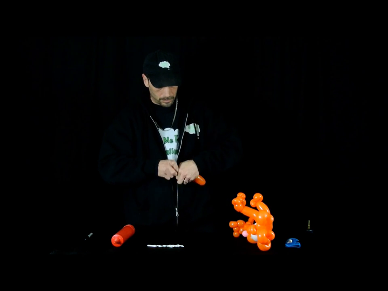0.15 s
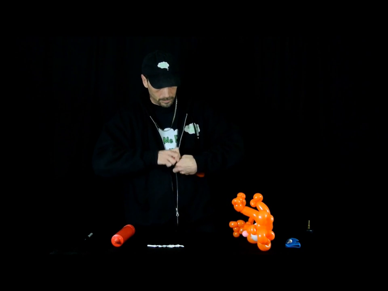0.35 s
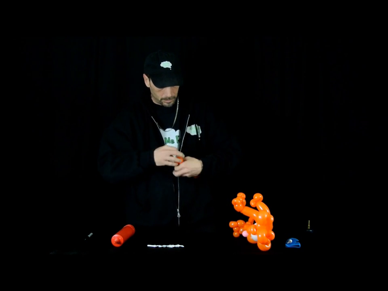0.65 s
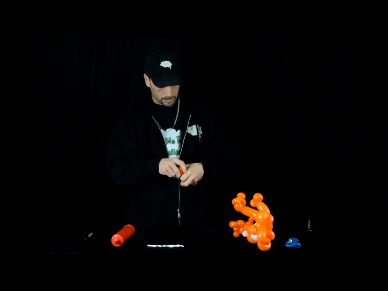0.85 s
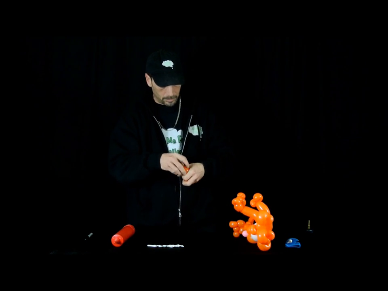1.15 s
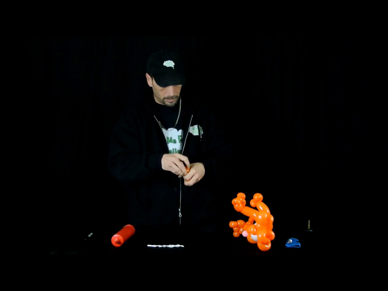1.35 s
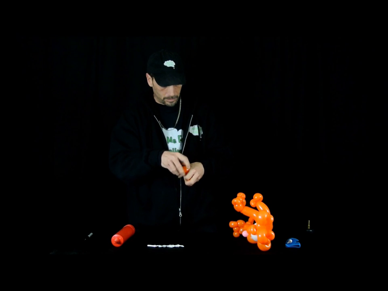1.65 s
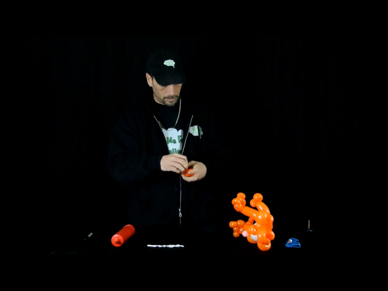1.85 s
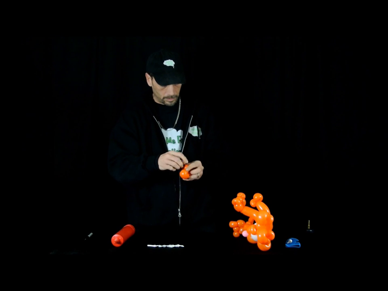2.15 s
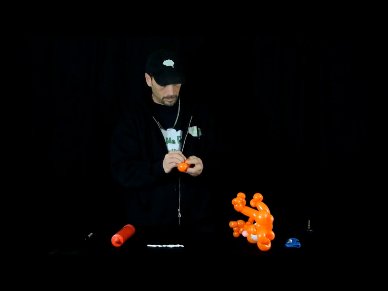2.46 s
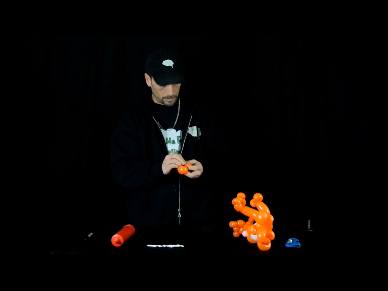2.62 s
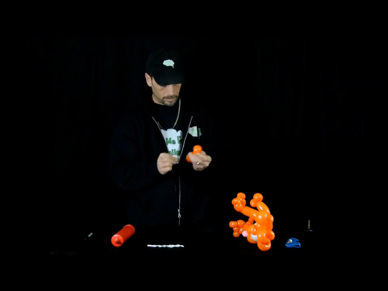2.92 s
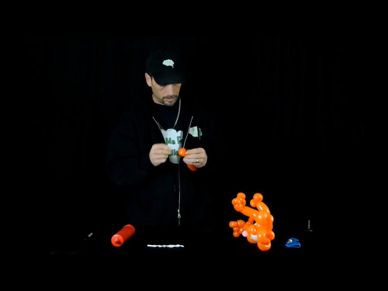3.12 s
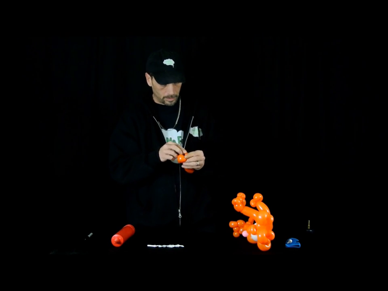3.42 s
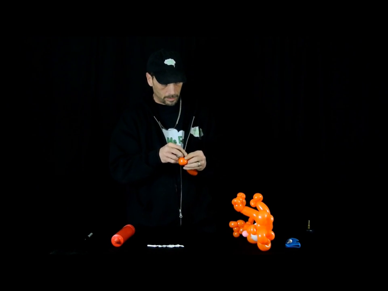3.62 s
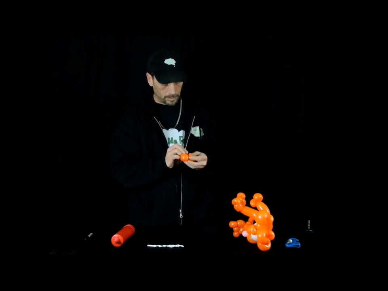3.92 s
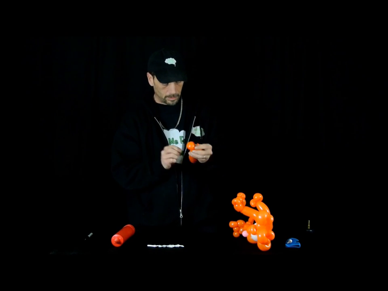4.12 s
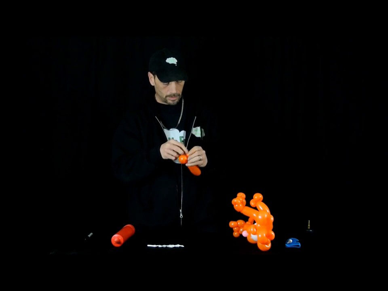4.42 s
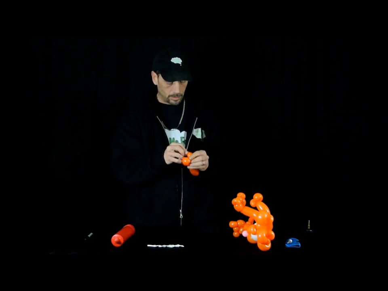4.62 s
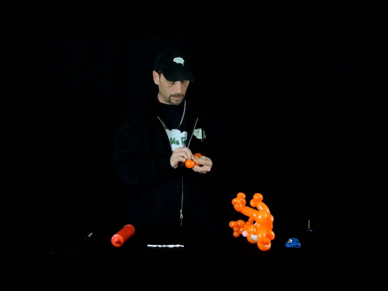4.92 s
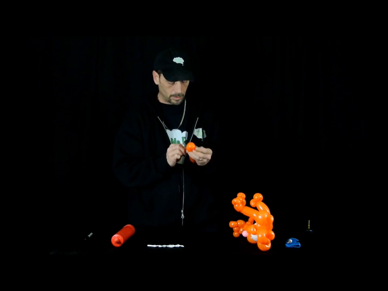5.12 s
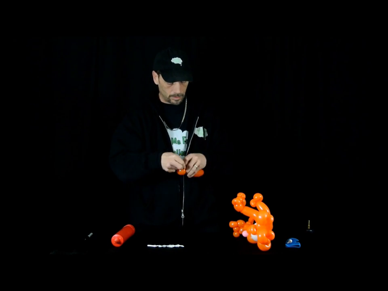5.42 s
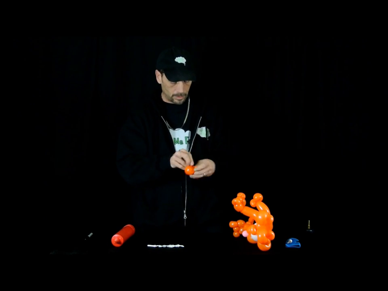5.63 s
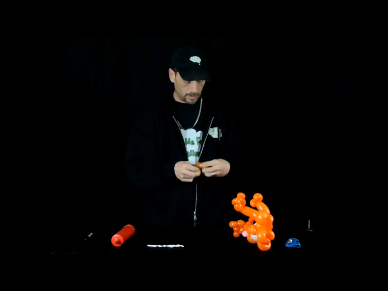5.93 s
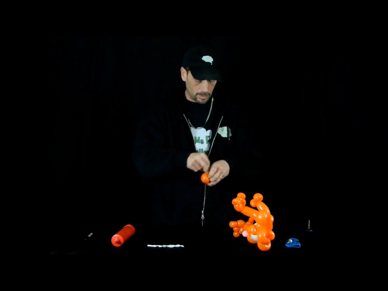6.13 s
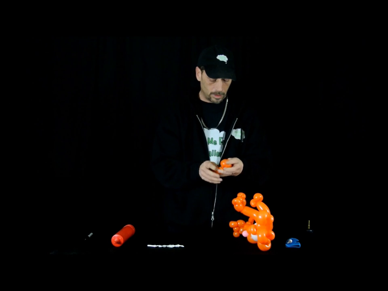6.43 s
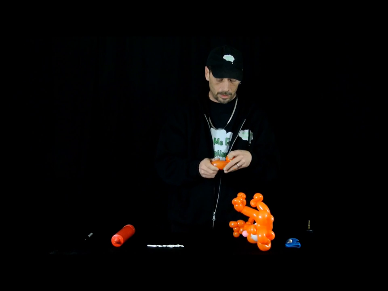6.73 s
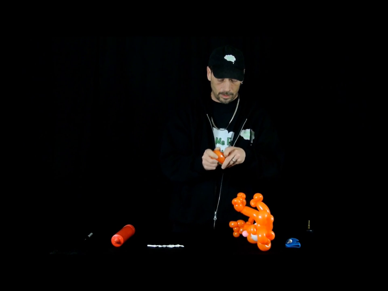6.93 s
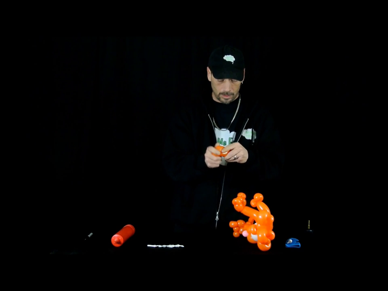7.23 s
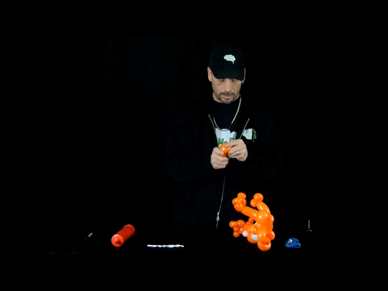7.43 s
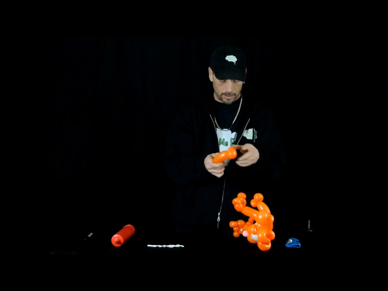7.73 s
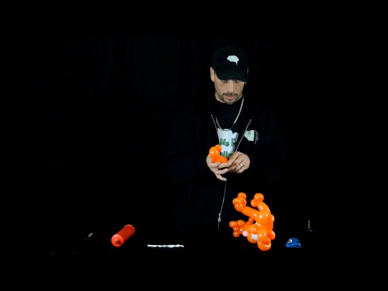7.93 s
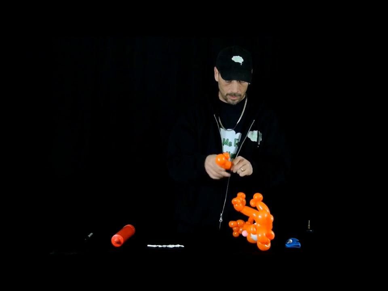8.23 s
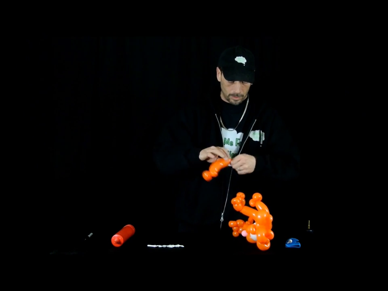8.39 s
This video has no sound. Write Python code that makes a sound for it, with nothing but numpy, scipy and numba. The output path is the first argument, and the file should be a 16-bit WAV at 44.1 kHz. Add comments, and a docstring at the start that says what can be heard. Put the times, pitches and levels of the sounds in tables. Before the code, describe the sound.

In a small room, close in stereo, hands twist a long latex balloon over a faint low hum and broad hiss. From the start, dry finger scuffs and grainy rubber rubbing come in uneven strokes; a bright snap, squeak and short creak stand out around 0.5 s. From 1 to 2.7 s the kneading is softer, with tiny squeaks and light ticks. Sharp snaps at about 2.9, 3.3 and 4.0 s bring rough falling sounds as the rubber slackens. Quieter rubbing follows until a hard pop at 5.6 s. Around 6 s the handling is denser, with short squeaks, a strong snap at 6.45 s and a squeaky creak near 6.6 s. Crisp, high snaps cluster between 7.1 and 7.5 s, then a duller snap and sagging ring come at 7.75 s. After 7.9 s only light scuffs remain, with a small tick near 8.45 s.

```python
"""Hands twist a long latex balloon into small bubbles: skin and latex rub in tiny random slips that ring
the bubbles, made from clicks and noise through moving filters. Now and then the rubber snaps free (ringing
noise bursts), creaks (steady pulses), squeaks (short tones) or goes slack (a rough ring, mostly sinking).
A small room answers every sound with fading noise, over a low hum and hiss, all heard in stereo."""
import sys
import numpy as np
from scipy import signal
from scipy.fft import rfft, irfft
from scipy.io import wavfile
from scipy.ndimage import uniform_filter1d
from numba import njit

SR = 44100
rng = np.random.default_rng(int(sys.argv[2]) if len(sys.argv) > 2 else 0)


def generate_wav(sig):
    """Save sig (samples, or channels by samples) to the path in sys.argv[1] as 16-bit PCM at SR."""
    pcm = np.round(np.clip(np.atleast_2d(sig).T, -1, 1) * 32767).astype(np.int16)
    wavfile.write(sys.argv[1], SR, pcm)


N = 377496


def undb(db):
    """Turn decibels into a plain amplitude factor."""
    return 10 ** (np.asarray(db) / 20)


def unit(x):
    """Scale a sound to an RMS (average strength) of 1."""
    return x / np.sqrt(np.mean(x ** 2))


@njit
def moving_band_pass(x, hz, width):
    """State-variable band-pass whose centre may move, gain 1 at the centre."""
    y, band_state, low_state = np.empty(len(x)), 0., 0.
    for i in range(len(x)):
        g, damping = np.tan(np.pi * hz[i] / SR), width[i] / hz[i]
        v = (band_state + g * (x[i] - low_state)) / (1 + g * (g + damping))
        band_state = 2 * v - band_state
        low_state += 2 * g * v
        y[i] = damping * v
    return y


def band(x, hz, width):
    """Band-pass with a fixed or moving centre and width [Hz]."""
    moving = np.zeros(len(x))
    return moving_band_pass(x + 1e-18, hz + moving, width + moving)  # the offset avoids slow, tiny numbers


def colour(x, points):
    """Shape a full-length sound by (frequency [Hz], gain [dB]) points."""
    hz, db = np.transpose(points)
    f = np.arange(N // 2 + 1) * SR / N + 1  # +1 avoids log(0)
    gain = undb(np.interp(np.log(f), np.log(hz), db))
    return irfft(rfft(x) * gain, N)


# tone of the background hiss: (frequency [Hz], relative level [dB])
HISS_FLOOR = [(15, -30), (25, 3), (64, -1.5), (170, 3), (714, 4.5), (988, 1), (1330, 1), (2220, -1.5),
              (3080, -4.5), (11900, -8.5), (14400, -11), (16000, -12)]
HISS_FLOOR_DB = -52.5  # RMS level
# steady hum tones: (frequency [Hz], width of the wavering part [Hz], level [dB])
HUM_TONES = [(58.8, 9.8, -62), (116.6, 33, -68), (168, 28, -78.5), (238, 23, -72.5)]


def background():
    """A slightly wavering hum, alike left and right, over broad hiss that differs between the sides."""
    mid = colour(rng.standard_normal(N), HISS_FLOOR)
    side = colour(rng.standard_normal(N), HISS_FLOOR)
    hiss = undb(HISS_FLOOR_DB) * unit(mid + 0.76 * side * np.array([[1], [-1]]))
    t = np.arange(N) / SR
    hum = 0
    for hz, width, db in HUM_TONES:
        waver = unit(band(rng.standard_normal(N), hz, width))
        hum = hum + undb(db) * (np.sin(2 * np.pi * hz * t) + .5 * waver)
    return hiss + hum


# bands of the room's answer: (centre [Hz], time to fall 60 dB [s], relative level [dB])
ROOM_BANDS = [(231, 0.5, -10), (730, 0.11, -4), (2060, 0.17, -1), (4670, 0.068, -8), (11400, 0.06, -10.5)]


def room(x, count=4):
    """A fading, diffuse answer, different left and right; the blend of answers drifts as the hands move."""
    t, out = np.arange(SR // 2) / SR, 0
    place = unit(uniform_filter1d(rng.standard_normal((count, N)), size=SR // 5))
    shares = place / np.sqrt(np.sum(place ** 2, axis=0))  # the shares' powers always add up to 1
    for share in shares:
        tail = 0
        for hz, t60, db in ROOM_BANDS:
            white = rng.standard_normal((2, len(t)))
            noise = np.array([band(band(n, hz, 1.6 * hz), hz, 0.94 * hz) for n in white])
            fade = (1 - np.exp(-t / 0.00057)) * undb(-60 * t / t60)
            tail = tail + undb(db) * noise * fade / np.sqrt(np.sum(fade ** 2))
        out = out + signal.oaconvolve((share * x)[None], tail, axes=1)[:, :N]
    return out


# a bubble slackening under the grip:
# (start [s], pitch at start [Hz], pitch at end [Hz], length [s], level [dB])
GRIP_SLACKENING = (7.6, 1400, 1020, 0.1, -39)


def slackening():
    """A rough ring: noise in a narrow band that sinks in pitch while its level swells and fades."""
    start, hz0, hz1, length, db = GRIP_SLACKENING
    out, u = np.zeros(N), np.linspace(0, 1, int(length * SR))
    hz = hz0 * (hz1 / hz0) ** u
    ring = unit(band(band(rng.standard_normal(len(u)), hz, .25 * hz), hz, .4 * hz))
    i = int(start * SR)
    out[i:i + len(u)] = undb(db) * ring * np.sin(np.pi * u) ** .7
    return out


# the tube springing slack after a hard snap:
# (start [s], pitch at start [Hz], pitch at end [Hz], length [s], starting level [dB])
SLACK_SAGS = [(2.893, 620, 280, 0.093, -30.5), (3.983, 660, 210, 0.084, -35), (5.626, 300, 80, 0.018, -40),
              (7.754, 700, 200, 0.12, -32.5)]


def sags():
    """A rough ring of filtered noise that slides down and fades as tension leaves the tube."""
    out = np.zeros(N)
    for start, hz0, hz1, length, db in SLACK_SAGS:
        u = np.linspace(0, 1, int(length * SR))
        hz = hz0 * (hz1 / hz0) ** u
        ring = unit(band(band(rng.standard_normal(len(u)), hz, .5 * hz), hz, 1.4 * hz))
        swell = np.minimum(30 * u, 1) * (1 - u ** 4)  # quick start, smooth end
        i = int(start * SR)
        out[i:i + len(u)] += undb(db - 14 * u) * ring * swell
    return out


# a bubble squeaking on one pitch:
# (start [s], end [s], pitch at start [Hz], pitch at end [Hz], middle level before wavering [dB])
PITCHED_SQUEAKS = [(0.093, 0.124, 3250, 3400, -51), (0.535, 0.598, 1250, 1260, -46),
                   (0.917, 1.012, 783, 700, -49.5), (1.394, 1.445, 774, 770, -47),
                   (1.809, 1.862, 718, 700, -47.5), (2.94, 2.995, 202, 170, -47.5),
                   (3.021, 3.06, 1205, 1200, -48.5), (3.186, 3.235, 1266, 1260, -38.5),
                   (3.999, 4.036, 510, 500, -41), (4.035, 4.1, 194, 169, -43),
                   (4.778, 4.806, 698, 700, -47.5), (5.231, 5.246, 460, 380, -44),
                   (5.581, 5.633, 388, 370, -48), (5.865, 5.913, 373, 430, -49.5),
                   (6.064, 6.127, 376, 290, -47.5), (6.178, 6.212, 1217, 1250, -40),
                   (6.202, 6.243, 520, 310, -45), (6.58, 6.645, 868, 850, -36.5),
                   (6.582, 6.611, 1320, 1310, -40), (6.635, 6.699, 757, 660, -46),
                   (6.675, 6.81, 1050, 1050, -43.5), (7.34, 7.39, 1260, 1240, -47.5)]


def squeaks():
    """Short tones with a faint overtone, wavering in pitch and level."""
    out = np.zeros(N)
    for t0, t1, hz0, hz1, db in PITCHED_SQUEAKS:
        i = np.arange(int(t0 * SR), int(t1 * SR))
        waver = unit(uniform_filter1d(rng.standard_normal((2, len(i))), size=200))
        hz = np.linspace(hz0, hz1, len(i)) * (1 + 0.006 * waver[0])
        phase = 2 * np.pi * np.cumsum(hz) / SR
        level = undb(db + 4.5 * waver[1]) * np.hanning(len(i)) ** 0.14
        out[i] += level * (np.sin(phase) + 0.05 * np.sin(2 * phase))
    return out


# ringing modes of the taut bubbles: (frequency [Hz], width before hand damping [Hz], base level [dB])
BUBBLE_MODES = [(378, 29, -38), (674, 310, -15), (829, 32, 0), (1345, 144, 4.5), (1558, 128, 4),
                (2390, 860, 0), (2856, 69, 0.5), (3590, 1670, 0)]


def bubbles(x):
    """The taut bubbles ring on their modes: band-passes side by side, with alternating sign."""
    return sum((-1) ** k * undb(db) * band(x, hz, width) for k, (hz, width, db) in enumerate(BUBBLE_MODES))


# regular stick-slip: (start [s], end [s], slip rate at start [Hz], rate at end [Hz],
# level driving the bubbles [dB])
STICK_SLIP_CREAKS = [(0.56, 0.604, 630, 660, -37), (5.916, 5.954, 659, 640, -33),
                     (6.584, 6.64, 436, 436, -27)]


def creaks():
    """The rubber sticks and slips at a nearly steady rate; each slip is a fading pulse into the bubbles."""
    pulses = np.zeros(N)
    for t0, t1, hz0, hz1, db in STICK_SLIP_CREAKS:
        i = np.arange(int(t0 * SR), int(t1 * SR))
        wobble = unit(uniform_filter1d(rng.standard_normal(len(i)), size=100))
        rate = np.linspace(hz0, hz1, len(i)) * (1 + 0.02 * wobble)
        cycle = np.cumsum(rate) / SR % 1  # position within one stick-slip, 0 to 1
        slip = np.exp(-cycle / 0.076)
        pulses[i] += undb(db) * np.hanning(len(i)) ** 0.29 * unit(slip - slip.mean())
    return bubbles(pulses)


# rubber snapping free: (time [s], peak level before panning [dB], ring pitch [Hz],
# crack against ring [dB], bubble modes against ring [dB], time for the driving burst to fall 17 dB [ms])
RUBBER_SNAPS = [(0.0923, -36, 3330, -1, -11, 4), (0.195, -24, 4900, 2, -11, 3.3),
                (0.5106, -25.5, 4820, 5, -4, 2.7), (0.5195, -14, 1260, 21, -5.5, 3.3),
                (0.8992, -30, 1310, -6, 6, 4.3), (1.509, -35, 1300, -8, -2, 3),
                (1.57, -26.5, 1390, 3, 2, 3.5), (2.241, -36, 2500, -5, 0, 3),
                (2.3117, -34, 3000, -10, 0, 4.6), (2.8957, -19, 1540, -15, -9, 4.3),
                (2.9013, -11.5, 1510, -19, -11, 2.4), (2.9098, -9.5, 2100, 0, 9, 4),
                (3.024, -27, 1220, 5, -2, 3.3), (3.14, -29, 1360, 12, 6, 3),
                (3.2698, -18, 2550, -1, 4, 2.2), (3.323, -8.5, 1250, -4.5, 0, 1.3),
                (3.7598, -29, 1300, -24, -25, 7.8), (3.986, -14.5, 1240, -12, -17, 9),
                (3.9905, -7.5, 2540, -0.5, -6, 7.7), (4.876, -26, 1050, -22, -10, 6.6),
                (5.2608, -17.5, 1870, -8, -5, 2.9), (5.5668, -23, 4730, 8, -14, 3),
                (5.5872, -20, 2560, -1, -5, 3), (5.626, -2, 2100, -24, 2.5, 2.2),
                (5.874, -28, 4100, 7, -14, 3), (5.922, -18, 1290, -13, 21, 3.4),
                (6.4451, -3, 2260, 1.5, -0.5, 3), (7.0962, -11.5, 3800, -3, -5.5, 4.8),
                (7.1202, -8, 4700, 5, -17, 3.6), (7.1334, -7, 4700, 10, -7, 2),
                (7.248, -20, 5000, 15, 2, 3), (7.3884, -11.5, 4800, 4, -5, 4.8),
                (7.3924, -8, 3540, 13, -4, 3.5), (7.427, -15, 4760, 13, -2, 3),
                (7.5184, -8, 2700, 7.5, -2, 2.2), (7.681, -17, 2410, -5, 11, 2.8),
                (7.7526, -10, 845, 5, 3, 5.4), (8.4473, -31, 2200, 9, 1, 4.8)]
SNAP_PAN_DB = 2  # typical spread of left minus right from snap to snap


def snaps():
    """Each snap is a short ragged burst: a ring on its own pitch, the bubble modes and a high crack."""
    out, t = np.zeros((2, N + SR)), np.arange(int(.05 * SR)) / SR
    for start, db, hz, crack_db, modes_db, ms in RUBBER_SNAPS:
        noise = rng.standard_normal(len(t))
        burst = noise * abs(noise) ** 0.21 * np.exp(-t * 2000 / ms)  # the power makes it spikier
        ring = band(band(burst, hz, 0.16 * hz), hz, 0.98 * hz)
        modes = bubbles(burst)
        crack = band(band(burst, 10100.0, 8400.0), 11500.0, 10400.0)
        parts = (0, ring), (modes_db, modes), (crack_db, crack)
        snap = sum(undb(d) * part / abs(part).max() for d, part in parts)
        pan_db = SNAP_PAN_DB * rng.standard_normal()
        sides_db = db + np.array([[pan_db], [-pan_db]]) / 2
        i = int(start * SR)
        out[:, i:i + len(t)] += undb(sides_db) * snap / abs(snap).max()
    return out[:, :N]


SLIPS_PER_S, SLIP_SPREAD_DB = 2500, 3  # average rate; how unevenly loud the slips are


def slips():
    """Tiny random slips of uneven size over a fine scrape, both swelling and dipping in a stutter."""
    hit = rng.random(N) < SLIPS_PER_S / SR
    size_db = SLIP_SPREAD_DB * np.minimum(rng.exponential(size=N), 3.5)
    size = undb(size_db) * rng.choice([-1, 1], N)
    stutter_db = unit(uniform_filter1d(uniform_filter1d(rng.standard_normal(N), size=300), size=300))
    return (unit(hit * size) + 0.95 * rng.standard_normal(N)) * undb(stutter_db)


HAND_DAMPING = 1.7  # the palms widen each mode by this factor
SQUEEZE_SHIFT, SQUEEZE_DB = 0.035, 2.5  # typical wander in pitch (share) and in level [dB]


def kneaded(x):
    """The bubble modes while the hands squeeze: each wanders in pitch and strength."""
    out, knots = 0, np.arange(0, N + 1500, 1500)
    for k, (hz, width, db) in enumerate(BUBBLE_MODES):
        shift, swell = (np.interp(np.arange(N), knots, r) for r in rng.standard_normal((2, len(knots))))
        moving_hz = hz * (1 + SQUEEZE_SHIFT * shift)
        level = undb(db + SQUEEZE_DB * swell)
        out = out + (-1) ** k * level * band(x, moving_hz, HAND_DAMPING * width)
    return out


HOLD_S = 0.032  # longest time the rubber sticks before a snap


def sticking():
    """Time as the rubber feels it: it sticks, so nothing swells just before a snap."""
    time, before = np.arange(N) / SR, 0
    for snap_time, *_ in RUBBER_SNAPS:
        start = max(snap_time - HOLD_S, before + 0.0092)  # stay clear of the previous snap
        time[int(start * SR):int(snap_time * SR)] = start
        before = snap_time
    return time


STROKE_DROP_DB, STROKE_ROUND = 20, 1.39  # drop one rise or fall from the top; roundness of the top
# scrape left by a snap, against its peak; time for it to fall by STROKE_DROP_DB
AFTER_RUB_DB, AFTER_SLIDE_DB, AFTER_S = -28, -18.5, 0.035
# strokes of the hands: (strongest at [s], rise [s], fall [s], latex on latex [dB], fingers on skin [dB],
# slack low body [dB], ring centre [Hz], low body centre [Hz])
HAND_STROKES = [(0.0, 0.011, 0.098, -52, -41.5, -59, 2480.0, 590.0),
                (0.088, 0.032, 0.14, -48, -47.0, -64.0, 3580.0, 600.0),
                (0.2, 0.008, 0.15, -50.0, -42.5, -68, 2500.0, 450.0),
                (0.34, 0.081, 0.33, -45.5, -42.0, -58.5, 2170, 480.0),
                (0.526, 0.062, 0.1, -40.5, -35.5, -59, 1900.0, 840.0),
                (0.579, 0.025, 0.1, -30, -32.5, -46.5, 1800.0, 1000.0),
                (0.657, 0.039, 0.076, -39.5, -43, -49.5, 2230.0, 810.0),
                (0.972, 0.3, 0.099, -38.5, -40.5, -50.5, 2200, 850.0),
                (1.101, 0.038, 0.082, -47, -44, -55, 2020.0, 643),
                (1.168, 0.05, 0.16, -42, -40.5, -55, 2310.0, 810.0),
                (1.422, 0.24, 0.057, -40, -41.0, -53, 1650, 910.0),
                (1.519, 0.025, 0.033, -43.5, -46, -47.5, 1710.0, 740.0),
                (1.6, 0.062, 0.095, -38.5, -39, -53, 1690.0, 860.0),
                (1.828, 0.06, 0.046, -42, -42.0, -51, 1930, 800.0),
                (1.891, 0.186, 0.13, -41, -39.5, -52.0, 2220.0, 690.0),
                (2.048, 0.084, 0.28, -46.5, -48.0, -58, 1950.0, 630.0),
                (2.246, 0.011, 0.067, -43.5, -53.5, -65, 1990.0, 620.0),
                (2.328, 0.036, 0.063, -36.5, -46, -58.0, 3220, 560.0),
                (2.381, 0.063, 0.24, -36.5, -40.0, -56, 2160, 685),
                (2.692, 0.048, 0.05, -33.0, -52.5, -61, 2790.0, 640.0),
                (2.702, 0.17, 0.244, -41.5, -38, -54, 2800.0, 700.0),
                (2.865, 0.028, 0.04, -39.5, -35.0, -62, 1600.0, 600.0),
                (2.921, 0.066, 0.074, -25.5, -30.5, -35.5, 1650, 533),
                (3.039, 0.1, 0.069, -40, -41, -47.5, 1440.0, 656),
                (3.186, 0.081, 0.1, -33.5, -34.5, -49, 1660, 760),
                (3.274, 0.024, 0.051, -34.5, -39.5, -52, 1950.0, 730.0),
                (3.325, 0.009, 0.11, -30.5, -38.5, -41, 1270.0, 940.0),
                (3.547, 0.063, 0.1, -48.5, -49.0, -60, 1780.0, 740.0),
                (3.682, 0.042, 0.043, -50.5, -54.5, -61.0, 1480.0, 730.0),
                (3.836, 0.16, 0.219, -39.5, -46.5, -52.0, 2190.0, 880.0),
                (3.994, 0.028, 0.12, -27.5, -31.5, -35.5, 2000, 800.0),
                (4.293, 0.35, 0.19, -48.5, -51, -57.5, 1960, 610.0),
                (4.487, 0.14, 0.026, -48, -52, -54.0, 1470.0, 578),
                (4.618, 0.075, 0.042, -35.0, -58, -66, 1690.0, 780.0),
                (4.702, 0.2, 0.063, -37.0, -42.0, -47, 1600.0, 816),
                (4.804, 0.079, 0.079, -42.5, -42.0, -52, 1890.0, 700.0),
                (4.937, 0.15, 0.062, -36.0, -42.5, -49, 1963, 850.0),
                (5.108, 0.219, 0.077, -40, -37.5, -59.5, 2340.0, 530.0),
                (5.267, 0.2, 0.11, -37.0, -38.5, -49, 2080, 640.0),
                (5.443, 0.12, 0.16, -41.0, -39, -52.5, 2200, 784),
                (5.581, 0.02, 0.064, -44.0, -32.0, -59.0, 2740.0, 450.0),
                (5.62, 0.05, 0.21, -31.5, -34, -43, 2180, 846),
                (5.75, 0.053, 0.13, -51, -37.5, -52, 2150.0, 641),
                (5.882, 0.02, 0.054, -42, -38, -51, 2320.0, 460.0),
                (5.925, 0.01, 0.05, -37, -38, -39, 1400.0, 700.0),
                (5.948, 0.15, 0.085, -37.5, -33.5, -45.0, 1450, 800),
                (6.027, 0.031, 0.05, -29.5, -34.5, -52.0, 2240, 700.0),
                (6.06, 0.11, 0.16, -36, -35.0, -48.5, 2220.0, 706),
                (6.195, 0.03, 0.039, -40, -37, -50, 2000.0, 550.0),
                (6.229, 0.14, 0.177, -36.5, -33, -42, 2180, 610.0),
                (6.378, 0.022, 0.098, -40.5, -36.5, -57.0, 2110.0, 670.0),
                (6.469, 0.11, 0.19, -37.5, -33, -42.5, 2370, 690.0),
                (6.606, 0.035, 0.098, -32.0, -39, -41, 2300, 955),
                (6.717, 0.15, 0.224, -36, -34.5, -44.5, 1490, 720.0),
                (6.887, 0.033, 0.092, -41, -39, -50, 1560.0, 1060.0),
                (6.993, 0.089, 0.399, -46.5, -42, -60.0, 2140, 690.0),
                (7.106, 0.019, 0.12, -32.5, -28, -65, 2000.0, 690.0),
                (7.255, 0.066, 0.12, -41, -36.5, -65, 2000.0, 600.0),
                (7.399, 0.059, 0.161, -36.5, -28.5, -57, 2000.0, 740.0),
                (7.526, 0.024, 0.064, -39.5, -29.5, -65, 2000.0, 850.0),
                (7.69, 0.1, 0.065, -28.5, -31, -40, 1870, 810.0),
                (7.76, 0.037, 0.072, -29, -31, -29, 1290.0, 694),
                (7.83, 0.04, 0.071, -49, -53, -42, 1100.0, 500.0),
                (7.987, 0.02, 0.05, -56, -51, -61, 1570.0, 610.0),
                (8.036, 0.087, 0.033, -52.0, -54.5, -54, 1670.0, 690.0),
                (8.159, 0.041, 0.14, -52.0, -46.0, -64, 2350.0, 560.0),
                (8.3, 0.02, 0.034, -45, -50, -48, 1500.0, 690.0),
                (8.307, 0.16, 0.05, -48.5, -41.5, -56.0, 1970.0, 610.0),
                (8.455, 0.011, 0.45, -48.5, -45.0, -55.5, 2050.0, 600.0)]


def strokes(step=64):
    """Add up the strokes' powers into rub, slide and low strengths; louder strokes pull the centres more."""
    time = sticking()[::step]  # one value every `step` samples is enough
    top, rise, fall, rub_db, slide_db, low_db, hz, low_hz = np.transpose(HAND_STROKES)
    late = time - top[:, None]
    away = np.where(late < 0, -late / rise[:, None], late / fall[:, None])
    drop_db = np.minimum(STROKE_DROP_DB * away ** STROKE_ROUND, 200)
    power = undb(-2 * drop_db)  # doubling the dB turns amplitude into power
    rub, slide, low = (undb(2 * db) @ power for db in (rub_db, slide_db, low_db))
    ring_centre = undb(2 * rub_db) * hz @ power / rub
    low_centre = undb(2 * low_db) * low_hz @ power / low

    snap_time, snap_db = np.array(RUBBER_SNAPS)[:, :2].T
    since = time - snap_time[:, None]
    fading = (since >= 0) * undb(-2 * STROKE_DROP_DB * abs(since) / AFTER_S)
    after = undb(2 * snap_db) @ fading
    rub = rub + undb(2 * AFTER_RUB_DB) * after
    slide = slide + undb(2 * AFTER_SLIDE_DB) * after
    curves = rub ** .5, slide ** .5, low ** .5, ring_centre, low_centre
    return [np.interp(np.arange(N), np.arange(0, N, step), curve) for curve in curves]


# tone of fingers sliding on skin: (frequency [Hz], relative level [dB])
FINGER_HISS = [(1760, -24), (3000, -2.5), (3680, -2), (4290, -3), (4630, 0.5), (8000, -0.5), (10900, 0),
               (15100, -5.5), (16000, -47.5)]


def rubbing():
    """Slips ring the bubbles around a centre set by the grip; slack latex rumbles; fingers hiss."""
    rub, slide, slack, hz, low_hz = strokes()
    x = slips()
    modes = unit(band(band(kneaded(x), hz, 1.76 * hz), hz, 1.14 * hz))
    broad = unit(band(band(x, 2750.0, 3800.0), 2430.0, 3800.0))
    ring = unit(modes + 0.46 * broad)
    low = unit(band(band(x, low_hz, 0.63 * low_hz), low_hz, 2.8 * low_hz))
    hiss = unit(colour(slips(), FINGER_HISS))
    return rub * ring + slack * low + slide * hiss


def scene():
    """The balloon's sounds, the room's answer to them and the background."""
    balloon = rubbing() + creaks() + squeaks() + sags() + slackening() + snaps()
    return balloon + room(balloon.mean(axis=0)) + background()


@njit
def follow(x, attack, release):
    """Track loudness: rise fast and fall slowly."""
    level, y = 0., np.empty(len(x))
    for i in range(len(x)):
        level += (x[i] - level) * (attack if x[i] > level else release)
        y[i] = level
    return y


GAIN_KNEE_DB, GAIN_RATIO = -28, 1.214  # gain drops above the knee; input dB per output dB there
GAIN_ATTACK_S, GAIN_RELEASE_S = 0.0068, 0.076
CEILING, TOP_HZ = .75, 15900  # rounding limit for peaks (amplitude); highest frequency kept
# stereo width: (frequency [Hz], gain of the left-right difference [dB])
STEREO_WIDTH = [(60, 2), (500, -1.5), (2000, 1.5), (5000, 6.5), (9000, 5.5), (14000, 7)]


def record(dry):
    """Widen the stereo, most in the treble; turn loud sounds down, round peaks and cut the top."""
    mid, side = (dry[0] + dry[1]) / 2, colour(dry[0] - dry[1], STEREO_WIDTH) / 2
    wide = np.array([mid + side, mid - side])
    loud = follow(abs(wide).max(axis=0), 1 / (GAIN_ATTACK_S * SR), 1 / (GAIN_RELEASE_S * SR))
    gain = np.maximum(loud / undb(GAIN_KNEE_DB), 1) ** (1 / GAIN_RATIO - 1)
    rounded = CEILING * np.tanh(wide * gain / CEILING)
    top_cut = signal.ellip(10, .2, 70, TOP_HZ, fs=SR, output="sos")
    return signal.sosfilt(top_cut, rounded)


dry = scene()
out = record(dry)
generate_wav(out)
```